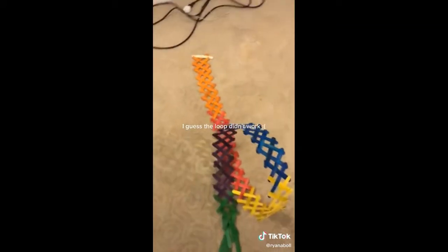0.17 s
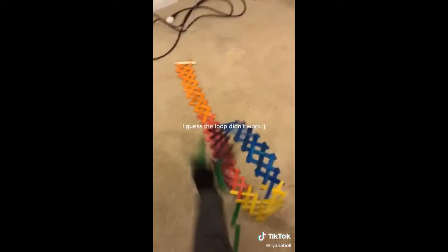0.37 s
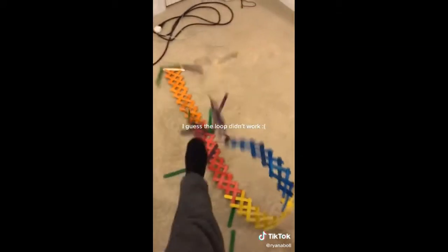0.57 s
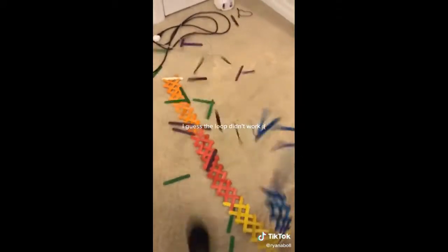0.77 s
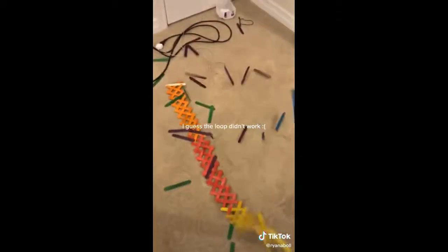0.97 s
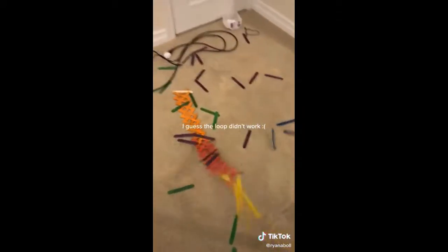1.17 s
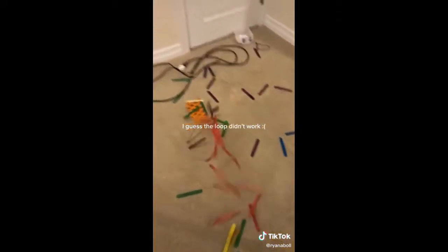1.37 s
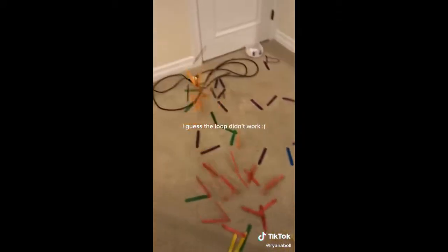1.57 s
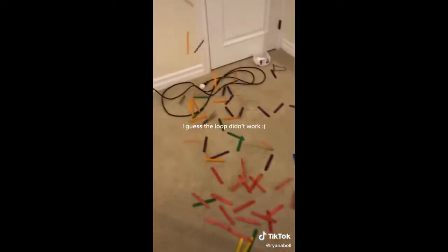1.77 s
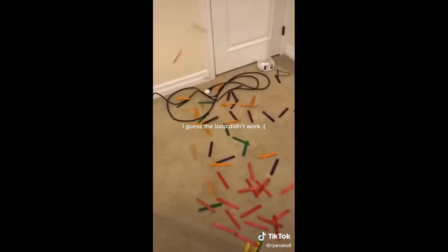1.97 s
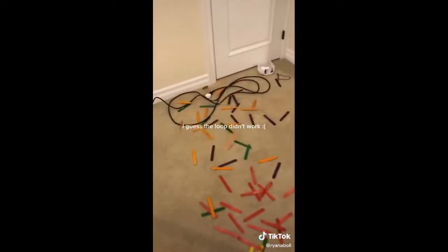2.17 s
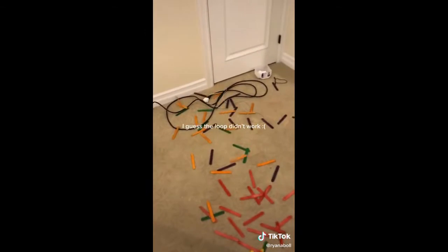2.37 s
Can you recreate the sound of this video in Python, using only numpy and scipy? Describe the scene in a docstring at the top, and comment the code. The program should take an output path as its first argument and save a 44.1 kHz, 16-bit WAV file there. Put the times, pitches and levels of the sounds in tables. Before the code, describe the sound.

A woven chain of thin wooden sticks springs apart, snapping and clattering onto carpet in a small room

```python
"""Stick weave springing apart

A woven chain of thin wooden sticks springs apart on a carpet in a small furnished room, near a phone.
Sticks snap in runs and rattle as they fly and land: bundles of short decaying bending and twisting modes.
Single rings make close ticks, dull knocks and floor thuds; dense damped touches patter on the carpet.
Sparse decaying echoes give each click a short tail, over shaped noise for the low rumble of the house."""
import sys
import numpy as np
from scipy import signal
from scipy.io import wavfile
from scipy.ndimage import uniform_filter1d

SR = 44100
rng = np.random.default_rng(int(sys.argv[2]) if len(sys.argv) > 2 else 0)


def transcribe(signal):
    """Save signal, clipped to [-1, 1], as a 16-bit WAV file at the path in sys.argv[1]."""
    frames = np.atleast_2d(signal).T
    limited = np.clip(frames, -1, 1)
    pcm = np.round(limited * 32767).astype(np.int16)
    wavfile.write(sys.argv[1], SR, pcm)


def gain_from_db(level_db):
    """Turn a decibel level (scalar or array-like) into a linear amplitude factor."""
    decades = np.asarray(level_db, float) / 20
    return 10 ** decades


N = 108045  # length in samples

# Low rumble and faint hiss of the house, spectrum shape: pitch_hz, relative level_db (per Hz)
HOUSE_SPECTRUM = [(18, -74), (30, -8.5), (97, 4.5), (121, 2), (178, -16.5), (466, -45), (1890, -41),
                  (13000, -64)]
# Patter of sticks landing on carpet, before the patter trim: time_s, level_db
PATTER_LEVELS = [(0.0, -64.5), (0.16, -66), (0.26, -50.5), (0.77, -54), (0.8, -48.5), (1.12, -55),
                 (1.17, -42), (1.73, -55), (1.75, -47), (2.14, -60.5), (2.31, -52), (2.45, -67.5)]
# Damped modes of a landing on carpet, before detuning: pitch_hz, level_db, t60_s
CARPET_MODES = [(196.4, 2, 0.032), (300, 15.5, 0.014), (526, 3.5, 0.007), (601, 8, 0.022),
                (857, -4.5, 0.027)]
# Free bending and twisting modes of one stick, before detuning: pitch_hz, level_db
STICK_MODES = [(1100, -7.5), (1600, -5), (2100, 0), (3000, -3), (3900, -2.5), (4600, -3), (5400, 0.5),
               (6300, -4), (7100, 0.5), (8200, 0), (9200, 3), (10200, -12), (11300, 7.5), (12500, 3.5)]
# Rattle of the many sticks, before the rattle trim:
# time_s, high_modes_level_db, low_modes_relative_db, middle_modes_relative_db
RATTLE_LEVELS = [(0.13, -64, -4.5, -9.5), (0.16, -59, -19, -2.5), (0.26, -25.5, -12.5, -15.5),
                 (0.335, -23.5, -15.5, -14), (0.37, -34.5, -13.5, -10), (0.44, -32, -14, -12),
                 (0.513, -37.5, -6.5, -3), (0.529, -21, -19.5, -12.5), (0.62, -40, -10, -7),
                 (0.764, -32.5, -15, -13), (0.83, -49.5, 4, 5), (0.99, -45, -4.5, 2.5),
                 (1.11, -44.5, -1, 3), (1.198, -29, -9, -3.5), (1.29, -41, -6, -0.5),
                 (1.325, -50.5, 4.5, 5), (1.345, -39.5, -4.5, 1), (1.43, -42.5, -5, 3.5),
                 (1.47, -32.5, -7, -1.5), (1.74, -57, 0.5, 9), (1.748, -26.5, -14.5, -8.5),
                 (1.779, -39, -5.5, -1), (1.97, -62.5, 3, 7), (2.06, -49.5, -11, 2.5),
                 (2.134, -61.5, -1, 1), (2.136, -42, -17, 4.5), (2.189, -42.5, -3.5, -2),
                 (2.25, -58.5, -2, 5), (2.309, -48.5, 0.5, 2), (2.45, -62.5, -2, 5)]
# Loud snaps, before the snap trim:
# start_s, level_db, low_modes_relative_db, high_modes_relative_db, strongest_mode_pitch_hz
SNAP_EVENTS = [(0.022, -45.5, -2.5, -4, 3060), (0.1707, -30, -5, -3.5, 3630), (0.2145, -32, -15, 0, 7550),
               (0.221, -21.5, -1, 4.5, 7600), (0.2343, -27, 4, 10, 8800), (0.258, -23, 8.5, 9, 8800),
               (0.28, -11.5, -4.5, 5, 6860), (0.5316, -22, -23, 0, 9000), (0.5813, -21.5, -2.5, 9.5, 8900),
               (0.654, -31.5, -14, 13.5, 9200), (0.6985, -24.5, -21, 13, 9100),
               (0.914, -21, -14, 0.5, 2340), (0.959, -24, -21, -7, 5180), (0.9767, -13, -2, -0.5, 8400),
               (1.1168, -24, -16, 1.5, 5200), (1.1297, -15.5, -1, -0.5, 3820),
               (1.267, -16.5, -17, -3, 5800), (1.3366, -25, -9, 0.5, 5960), (1.3625, -17.5, -14, -4, 5740),
               (1.4425, -19.5, -16, -5, 10000), (1.462, -18.5, -20, -4, 9200), (1.48, -12.5, -4, -4, 5040),
               (1.5149, -17.5, -20, -2.5, 7200), (1.5628, -17.5, -7, 1.5, 11300),
               (1.6763, -23.5, -1, -2.5, 4300), (1.7069, -17, -6.5, -3, 7170), (1.7495, -16, -1, 2, 9200),
               (1.8176, -23, -9, -1, 5200), (1.8818, -22.5, -6, -2, 2170),
               (1.9573, -32.5, -3.5, -5.5, 4400), (1.9972, -22.5, -1.5, -3, 4930),
               (2.052, -21.5, -4, 3, 9070), (2.1373, -20.5, -7, -0.5, 9220), (2.1614, -21, -2.5, 4, 8900),
               (2.177, -21, -1.5, -0.5, 11800), (2.273, -26.5, -12, -3.5, 6800), (2.296, -31, 8, 0, 1020),
               (2.3975, -29.5, -20, -2, 5150)]
# Gain of the topmost stick modes, dull at first while the weave still holds the sticks: time_s, gain_db
TOP_GAIN = [(0, -21), (.77, -4.5), (.8, -4.5), (1.6, -0.5), (2.45, -8)]
# Dull knocks on the floor, before the knock trim: start_s, level_db, pitch_hz
KNOCK_EVENTS = [(0.265, -24.5, 615), (0.775, -23.5, 690), (0.7805, -26.5, 760), (0.983, -28, 676),
                (1.164, -26.5, 510), (1.231, -35, 566), (1.486, -28, 640), (1.646, -35, 600),
                (1.75, -27, 624), (1.762, -26, 660), (2.053, -38, 570)]
# Low thuds through the floor, before the knock trim: start_s, level_db, pitch_hz
THUD_EVENTS = [(0.782, -28.5, 247), (0.9, -37, 330), (0.976, -36, 322), (1.18, -35, 346),
               (1.481, -33.5, 345), (1.858, -35.5, 239), (2.243, -41, 179), (2.296, -32, 168)]
# Single ticks of one stick on another, close by: start_s, level_db, pitch_hz, t60_cycles
TICK_EVENTS = [(0.2806, -11.5, 2030, 11.5), (0.2982, -17, 1450, 12), (.325, -10.5, 9500, 27),
               (.331, -17.5, 9600, 50), (0.522, -20, 6860, 25), (.5425, -9.5, 9300, 21),
               (1.132, -20, 3730, 45), (1.157, -18, 4230, 40), (1.174, -19, 2950, 33),
               (1.1918, -17.5, 5250, 40), (1.1985, -20, 4300, 40), (1.4713, -21, 5200, 18),
               (1.476, -2.5, 5300, 12.5), (1.4848, -17.5, 4120, 36), (1.75, -12, 11000, 32)]
# Decay of the room by band: pitch_hz, t60_s
ROOM_DECAY = [(300, 0.3), (1300, 0.12), (3500, 0.12), (9000, 0.11), (13000, .12)]
# Stretches where the treble widens: start_s, end_s
WIDE_STRETCHES = [(.13, .18), (.25, .64), (.7, .9), (.92, .97), (1, 1.16), (1.21, 1.26), (1.31, 1.37),
                  (1.39, 1.44), (1.52, 1.555), (1.8, 1.87), (1.95, 1.99), (2.22, 2.27)]

LOW_TOP_HZ, HIGH_FOOT_HZ = 2600, 6700  # borders between low, middle and high stick modes


def evened(x):
    """Scales a sound to rms 1."""
    return x / np.sqrt(np.mean(x ** 2) + 1e-20)


def read(points, hz):
    """Reads a (pitch_hz, value) table on a log pitch axis."""
    f, value = np.transpose(points)
    return np.interp(np.log(hz + 1), np.log(f + 1), value)


def level_curve(time_s, level_db):
    """Draws a gain curve through levels in dB over the whole scene."""
    return gain_from_db(np.interp(np.arange(N) / SR, time_s, level_db))


def add(mix, start_s, sound):
    """Mixes a sound in at start_s."""
    part = mix[round(start_s * SR):][:len(sound)]
    part += sound[:len(part)]


def ring(hz, db, t60):
    """One mode: a sine that swells over a cycle or two while it decays exponentially."""
    rise_cycles = 0.56
    t = np.arange(round(np.clip(t60, .002, .15) * SR)) / SR
    swell = 1 - np.exp(-t * hz / rise_cycles)
    return gain_from_db(db - 60 * t / t60) * swell * np.sin(2 * np.pi * hz * t)


def stick_t60(hz):
    """Decay time in seconds of a stick mode: higher modes die faster."""
    return .013 * (2000 / hz) ** .45


def chord(modes, draws):
    """All modes (pitch_hz, level_db, t60_s) of one struck body, a little unlike any other."""
    detune, spread_db = 0.094, 1.5
    stagger_s = .0012  # modes speak a moment apart
    out = np.zeros(round(max(m[2] for m in modes) * SR) + 400)
    for (hz, db, t60), (a, b, c) in zip(modes, draws):
        mode = ring(hz * (1 + detune * a), db + spread_db * b, t60)
        add(out, stagger_s * abs(c), np.sign(c) * mode)
    return out


def scatter(groups, per_s, size_db, count=30):
    """Random touches on count different bodies; one row of rms 1 per group of modes."""
    out = np.zeros((len(groups), N))
    for _ in range(count):
        sizes = gain_from_db(size_db * np.minimum(rng.exponential(1, N), 4))
        hits = sizes * (rng.random(N) < per_s / count / SR)
        for k, modes in enumerate(groups):
            body = chord(modes, rng.standard_normal((len(modes), 3)))
            out[k] += signal.oaconvolve(hits, body / np.linalg.norm(body))[:N]
    return [evened(row) for row in out]


def house():
    """Low rumble with a faint hiss: noise shaped by a spectrum with smooth random lumps."""
    house_db, lump_db = -55, 1.5
    frames, hz = N // 512 + 6, np.fft.rfftfreq(2048, 1 / SR)
    real, imaginary, lumps = rng.standard_normal((frames, 1025, 3)).T
    lumps = uniform_filter1d(lumps, size=3, axis=0)
    lumps = evened(uniform_filter1d(lumps, size=5, axis=1))
    spectrum = gain_from_db(read(HOUSE_SPECTRUM, hz)[:, None] + lump_db * lumps)
    noise = signal.istft((real + 1j * imaginary) * spectrum, nperseg=2048, noverlap=1536)[1][:N]
    return gain_from_db(house_db) * evened(noise)


def patter():
    """Soft landings on the carpet: dense random touches of low, damped modes."""
    patter_db, landings_per_s, size_db = -5, 400, 3.2
    landings = scatter([CARPET_MODES], landings_per_s, size_db)[0]
    return gain_from_db(patter_db) * level_curve(*np.transpose(PATTER_LEVELS)) * landings


def rattle():
    """Dense small touches of sticks; low, middle and high modes follow their own levels."""
    rattle_db, touches_per_s, size_db = -4.5, 1000, 4.5
    time_s, high_db, low_db, mid_db = np.transpose(RATTLE_LEVELS)
    stick = [(hz, db, stick_t60(hz)) for hz, db in STICK_MODES]
    low = [m for m in stick if m[0] < LOW_TOP_HZ]
    mid = [m for m in stick if LOW_TOP_HZ <= m[0] <= HIGH_FOOT_HZ]
    high = [m for m in stick if m[0] > HIGH_FOOT_HZ]
    rows = scatter([low, mid, high], touches_per_s, size_db)
    levels = (high_db + low_db, high_db + mid_db, high_db)
    return sum(level_curve(time_s, rattle_db + db) * row for row, db in zip(rows, levels))


def snaps():
    """Each snap rings all modes of a stick, then chatters in weaker touches against its neighbours."""
    snap_db, lead_db = -3, 5.5  # lead: the strongest mode of a snap stands out
    chatter_s, chatter_db, chatter_touches = .005, -6, 6
    out = np.zeros(N)
    for start_s, db, low_db, high_db, lead_hz in SNAP_EVENTS:
        modes = []
        for hz, mode_db in STICK_MODES:
            tilt_db = low_db if hz < LOW_TOP_HZ else high_db if hz > HIGH_FOOT_HZ else 0
            modes.append((hz, mode_db + tilt_db, stick_t60(hz)))
        size = gain_from_db(snap_db + db) / np.sqrt(len(modes))
        add(out, start_s, size * chord(modes, rng.standard_normal((len(modes), 3))))
        for _ in range(chatter_touches):
            delay, strength = rng.standard_normal(2)
            touch = chord(modes, rng.standard_normal((len(modes), 3)))
            add(out, start_s + chatter_s * abs(delay), size * gain_from_db(chatter_db + strength) * touch)
        add(out, start_s, size * ring(lead_hz, lead_db, 1.05 * stick_t60(lead_hz)))
    return out


def shade_top(sticks):
    """Moves the level of the topmost stick modes over time with a high shelf made by a highpass."""
    highpass = signal.butter(3, 10700, "high", fs=SR, output="sos")
    top = signal.sosfiltfilt(highpass, sticks)
    return sticks + top * (level_curve(*np.transpose(TOP_GAIN)) - 1)


def knocks():
    """Floor hits as short damped rings: hollow knocks and lower thuds."""
    knock_db, knock_cycles, thud_cycles = 1.5, 9.6, 12  # cycles to die 60 dB
    out = np.zeros(N)
    for events, cycles in ((KNOCK_EVENTS, knock_cycles), (THUD_EVENTS, thud_cycles)):
        for start_s, db, hz in events:
            add(out, start_s, ring(hz, db + knock_db, cycles / hz))
    return out


def ticks():
    """Close stick-on-stick ticks, each one short ring."""
    out = np.zeros(N)
    for start_s, db, hz, cycles in TICK_EVENTS:
        add(out, start_s, ring(hz, db, cycles / hz))
    return out


def room(x):
    """Three tails of sparse random echoes, dying by band, fed in turn as the sound moves about."""
    first_s, spacing, turn_hz = .003, 12, 7  # spacing in samples
    out, t = np.zeros(N), np.arange(N) / SR
    for k in range(3):
        taps = np.zeros(SR // 2)
        at = np.arange(round(first_s * SR), SR // 2 - spacing, spacing)
        taps[at + rng.integers(0, spacing, len(at))] = rng.choice([-1., 1.], len(at))
        hz, age_s, z = signal.stft(taps, SR, nperseg=128)
        decay = gain_from_db(-60 * age_s / read(ROOM_DECAY, hz)[:, None])
        tail = signal.istft(z * decay, SR, nperseg=128)[1]
        # the three squared shares always add up to one
        share = np.sqrt(2 / 3) * np.cos(2 * np.pi * turn_hz * t + k * np.pi / 3)
        out += signal.fftconvolve(x * share, tail / np.linalg.norm(tail))[:N]
    return out


def microphone(x):
    """Limits the band at both ends and adds the resonance of the microphone port."""
    port_hz, port_q, port_lift = 9160, 15, 0.72
    lowpass = signal.firwin(511, 13200, window=("kaiser", 9), fs=SR)
    x = signal.oaconvolve(x, lowpass, "same")
    x = signal.sosfilt(signal.butter(3, 45, "high", fs=SR, output="sos"), x)
    return x + port_lift * signal.lfilter(*signal.iirpeak(port_hz, port_q, SR), x)


def treble_spread(mid):
    """Side signal that flickers in patches of treble: smoothed magnitudes of mid with random phases."""
    foot_hz, top_hz, wide_db = 4296, 12650, -2.5
    patch_share = .75  # share of time-frequency patches that widen
    hz, t, z = signal.stft(mid, SR, nperseg=512)
    when = sum((t > start_s) & (t < end_s) for start_s, end_s in WIDE_STRETCHES)
    on = when * ((hz > foot_hz) & (hz < top_hz))[:, None]
    patches = rng.random((17, len(t) // 4 + 1)) < patch_share
    on = on * np.kron(patches, np.ones((16, 4)))[:len(hz), :len(t)]  # 16 bins by 4 frames each
    phases = np.exp(2j * np.pi * rng.random(z.shape))
    z = uniform_filter1d(abs(z), size=5, axis=1) * on * phases
    side = gain_from_db(wide_db) * signal.istft(z, SR, nperseg=512)[1][:N]
    highpass = signal.butter(6, 1.04 * foot_hz, "high", fs=SR, output="sos")
    return signal.sosfiltfilt(highpass, side)


def scene():
    """Sticks and floor in the room, over the house; the same in both channels."""
    room_db, near_room_db = -1.5, -5  # ticks and knocks carry less of the room
    wood = shade_top(snaps() + rattle()) + patter()
    near = ticks() + knocks()
    tails = room(gain_from_db(room_db) * wood + gain_from_db(near_room_db) * near)
    return np.tile(wood + near + tails + house(), (2, 1))


def top_cut(x):
    """Nothing passes above the cut-off."""
    return signal.sosfilt(signal.butter(12, 14290, fs=SR, output="sos"), x)


def record(dry):
    """One microphone; at times the treble spreads between the channels."""
    mid = microphone(dry[0])
    side = treble_spread(mid)
    return top_cut(np.array([mid + side, mid - side]))


dry = scene()
out = record(dry)
transcribe(out)
```